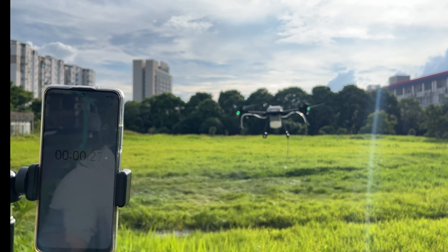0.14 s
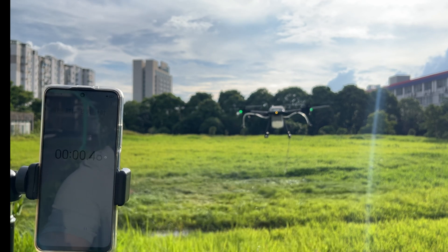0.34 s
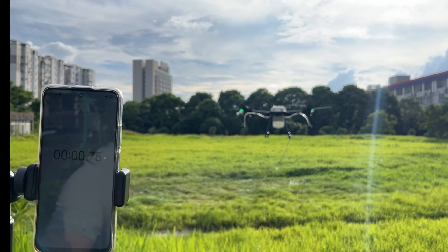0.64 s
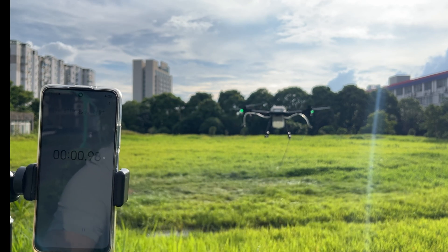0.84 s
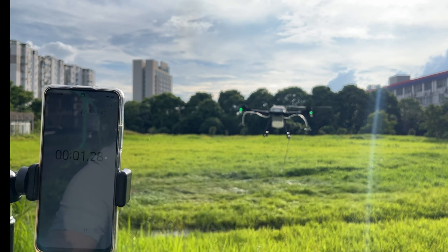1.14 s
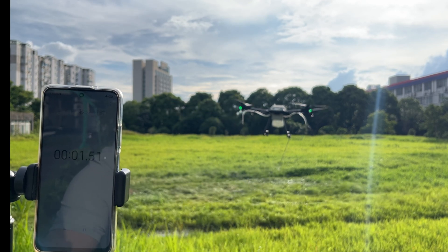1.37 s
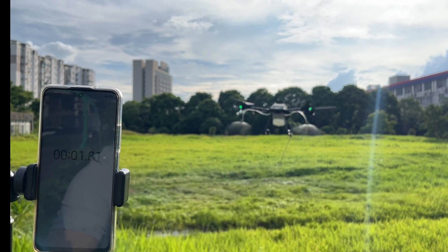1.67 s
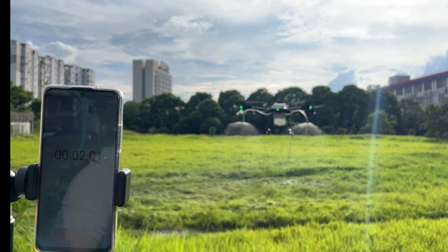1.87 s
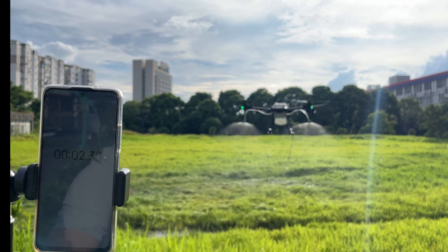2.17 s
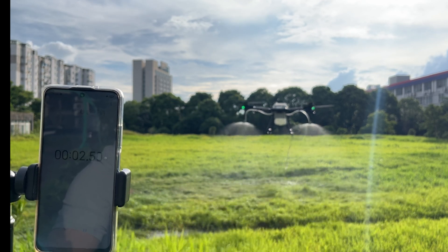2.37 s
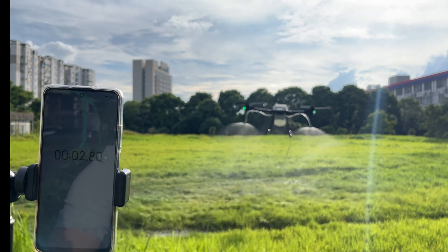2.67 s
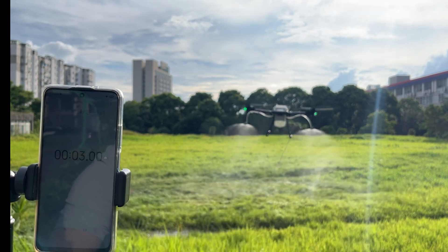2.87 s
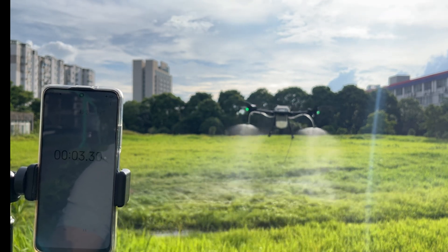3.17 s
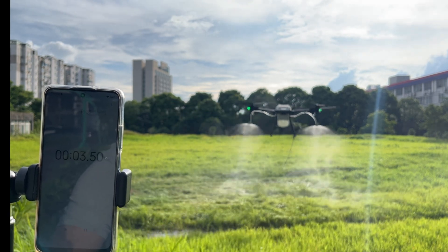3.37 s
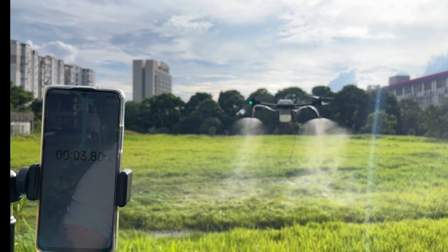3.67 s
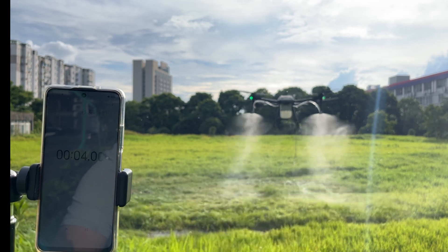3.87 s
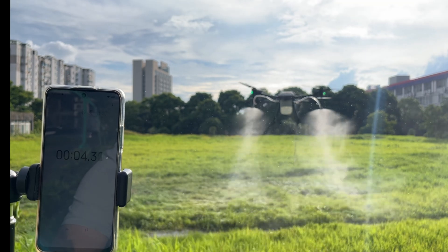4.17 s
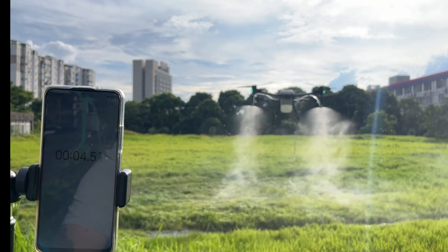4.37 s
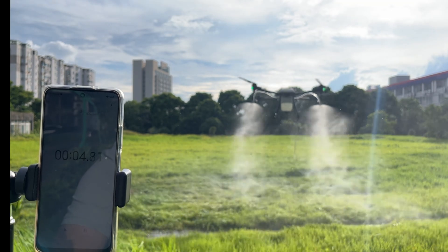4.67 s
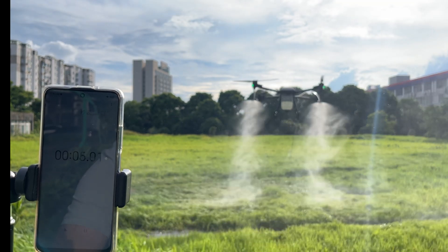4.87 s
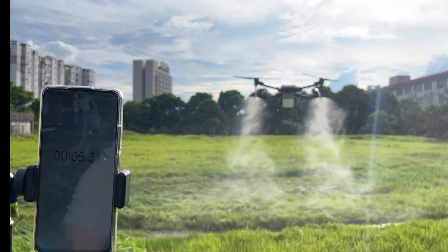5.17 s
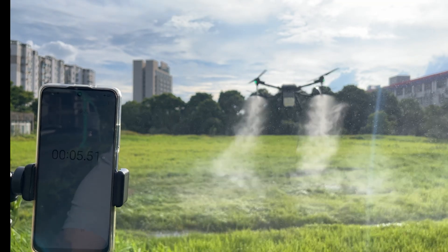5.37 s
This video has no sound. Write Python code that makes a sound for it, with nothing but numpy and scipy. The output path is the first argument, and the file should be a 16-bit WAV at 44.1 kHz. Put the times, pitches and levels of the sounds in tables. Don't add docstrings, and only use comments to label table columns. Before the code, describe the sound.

A steady loud rotor drone fills the whole stretch, low and throbbing as the four rotors drift in and out of step, with rushing noise pulsing on top. Faint insects whine very high. Spray nozzles briefly whistle, then hiss stronger and higher in the second half. Wind gusts thump a stereo phone microphone in an open field, hardest near 2.6, 4.1 and 5.5 seconds.

```python
import sys
import numpy as np
from scipy import signal
from scipy.fft import rfft, irfft
from scipy.io import wavfile
from scipy.ndimage import uniform_filter1d

SR = 44100
rng = np.random.default_rng(int(sys.argv[2]) if len(sys.argv) > 2 else 0)


def gain_from_db(level_db):
    decades = np.asarray(level_db, float) / 20
    return 10 ** decades


def wrap_up_sound(samples):
    columns = np.atleast_2d(samples).T
    tamed = np.clip(columns, -1, 1)
    steps = np.round(tamed * 32767).astype(np.int16)
    wavfile.write(sys.argv[1], SR, steps)


N = 243917
TIME = np.arange(N) / SR
HZ = np.arange(N // 2 + 1) * SR / N + 1e-3

# peak_s, level_db, length_s
GUSTS = [
    (.01, -29.5, 0.086),
    (.3, -38, 0.08),
    (.45, -28.5, 0.13),
    (2.584, -21, 0.045),
    (2.97, -30, 0.039),
    (3.236, -25, .1),
    (4.042, -15, 0.052),
    (4.202, -22, 0.054),
    (4.5, -28, 0.18),
    (5.51, -13, 0.047),
]
# frequency_hz, density_db
GUST_COLOUR = [(22, -45), (36, -17), (55, 3), (75, -6), (105, -3), (170, -16), (300, -15), (600, -60),
               (2000, -56)]
# start_s, level_db, start_hz, end_hz, length_s
POPS = [
    (0.444, -37, 160, 60, 0.031),
    (2.584, -15.5, 262.5, 116, 0.032),
    (4.029, -17, 223, 100, 0.015),
    (4.233, -10.5, 196.6, 98, 0.02),
    (5.476, -8, 441, 90, 0.031),
]
# start_s, length_s, start_hz, end_hz, level_db
NEAR_WHINES = [(1.28, .14, 10700, 10520, -52), (1.4, .16, 10530, 10430, -45),
               (1.83, .07, 10470, 10560, -48), (1.99, .14, 10600, 10480, -44),
               (2.13, .24, 10490, 10480, -50), (2.71, .15, 10430, 10550, -48),
               (2.85, .31, 10520, 10310, -46), (3.24, .06, 10400, 10450, -47),
               (3.46, .17, 10470, 10310, -46), (4.52, .19, 10520, 10480, -49), (4.7, .3, 10380, 10450, -47),
               (4.98, .3, 10450, 10300, -43), (2.62, .27, 10880, 10950, -54),
               (2.93, .19, 11020, 10960, -49), (3.48, .14, 11060, 10900, -48),
               (4.85, .3, 10950, 10950, -52)]
# start_s, length_s, start_hz, end_hz, level_db
FAR_WHINES = [
    (0, .5, 13800, 13500, -63),
    (1.15, 1.0, 13850, 13830, -61),
    (2.4, .9, 13830, 13800, -59),
    (3.55, .45, 13820, 13800, -61),
]
# time_s, centre_hz, level_db
SPRAY = [
    (0, 3700, -58),
    (1.5, 3750, -54),
    (3.1, 3500, -55),
    (3.45, 3500, -48),
    (4.0, 4050, -46),
    (4.25, 4500, -47),
    (4.5, 4820, -41),
    (4.72, 5050, -43),
    (4.9, 5300, -40),
    (5.53, 5360, -40.5),
]
# start_s, length_s, pitch_hz, level_db
SPURTS = [
    (1.77, 0.11, 3820, -41),
    (2.0, 0.17, 3880, -39),
]
# start_s, peak_db
CRACKS = [(0.543, -9), (0.625, -12), (0.6609, -8), (0.6729, -4), (0.6848, -7), (.963, -11), (1.4915, -9),
          (2.2248, -14), (2.8993, -10), (2.9582, -10), (3.3962, -12), (3.6267, -9), (3.7289, -11)]
# time_s, level_db, treble_tilt_db (at 6.4 kHz)
VORTEX = [(0, -28.5, 0.5), (.3, -29.5, 0.5), (.5, -25, -2), (.7, -26.5, 0), (.9, -26, -2.5),
          (1.3, -27.5, -0.8), (1.8, -26, -2.5), (2.25, -28, -0.5), (2.7, -29, -0.5), (3.0, -27.5, 0.5),
          (3.2, -29, 0.5), (3.4, -25.5, -0.1), (3.8, -27.5, -0.5), (4.2, -29, 1), (4.55, -27.5, 0.8),
          (4.85, -26, 1.5), (5.2, -27.5, 0.8), (5.53, -27, -1)]
# frequency_hz, density_db
VORTEX_COLOUR = [(60, 3.5), (190, -5), (500, 1.5), (600, -5.5), (1300, 0.5), (1680, -11), (1950, -5),
                 (2500, -6), (3600, -11), (5200, -20.5), (7500, -18), (10500, -23), (14000, -25.5),
                 (16000, -24)]
# time_s, rotor1_hz, rotor2_hz, rotor3_hz, rotor4_hz
BLADE_PASS = [(0.0, 82.64, 76.19, 71.28, 64.81), (0.325, 80.56, 76.12, 67.93, 70.48),
              (0.65, 82.1, 76.38, 68.98, 67.49), (0.975, 80.57, 74.79, 70.43, 68.72),
              (1.3, 73.93, 77.4, 72.53, 69.76), (1.625, 74.27, 72.74, 72.13, 69.98),
              (1.95, 75.28, 72.52, 72.74, 72.6), (2.275, 74.56, 72.25, 71.03, 72.36),
              (2.6, 73.66, 72.83, 69.99, 69.58), (2.925, 77.26, 71.91, 71.45, 76.84),
              (3.25, 84.25, 82.09, 72.81, 67.51), (3.575, 82.99, 77.61, 72.99, 73.75),
              (3.9, 77.2, 75.05, 67.08, 74.55), (4.225, 77.63, 77.98, 68.17, 74.59),
              (4.55, 77.64, 77.38, 72.99, 68.34), (4.875, 78.19, 74.6, 73.94, 69.62),
              (5.2, 76.18, 79.15, 75.24, 71.08), (5.525, 79.96, 76.74, 70.04, 70.55)]
# multiple, level_db
OVERTONES = [(2, -35), (3, -39.5), (4, -38), (5, -39.5), (6, -40.5), (7, -48.5), (8, -49), (9, -52),
             (10, -51.5)]
THUMP_DB = [-28.6, -27.4, -24.1, -28.5]
SLAP_DB = [-0.7, -1.46, 0, -4]
# time_s, load_db
LOAD = [(0, 1.3), (.5, 2.5), (1.1, 1.2), (1.6, -1.5), (2.1, -0.5), (2.6, 1.5), (3.0, -4), (3.5, 0.3),
        (4.1, 1), (4.6, -0.7), (5.1, -0.2), (5.53, -2)]
# peak_s, load_db, length_s
SURGES = [
    (4.212, 7, .04),
    (4.6, 2.8, .22),
]
# frequency_hz, left_lead_rad
CHANNEL_PHASE = [(200, -.1), (520, -.7), (850, .45), (1300, -.1), (1600, -1.2), (1850, -.1), (3200, .6),
                 (4500, 0), (5500, -1.8), (6600, -1.4), (8350, -3.14), (11100, -6.05), (12900, -6.5),
                 (15100, -9.42)]
# frequency_hz, left_minus_right_db
PORT_BALANCE = [(400, -.5), (520, -1.7), (720, -7), (930, -1.8), (1200, -2.2), (1700, 1), (2000, -1.5),
                (2400, 0), (2900, -1.4), (3600, 1.8), (7000, 0)]
# frequency_hz, level_db
SCATTER = [(100, -21), (400, -14.5), (750, 0), (1100, -13), (1600, 2), (2200, -17.5), (3500, -6.5),
           (5100, 1), (7000, -17), (8400, -13.5), (10000, -7), (12000, -6), (13500, 2), (15200, -13)]

HOVER_HZ = 74


def curves(table):
    time_s, *columns = np.transpose(table)
    return np.array([np.interp(TIME, time_s, column) for column in columns])


def over_hz(table):
    hz, value = np.transpose(table)
    return np.interp(np.log(HZ), np.log(hz + 1), value)


def unit(x):
    return x / np.sqrt(np.mean(x ** 2))


def colour(x, gain):
    return irfft(rfft(x) * gain, N)


def walk(rate_hz):
    hold = int(SR / rate_hz)
    held = np.repeat(rng.standard_normal(N // hold + 3), hold)
    slewed = uniform_filter1d(uniform_filter1d(held, hold), hold)
    return 1.3 * slewed[hold:hold + N]


def swell(peak_s, length_s):
    return np.exp(-((TIME - peak_s) / length_s) ** 2)


def phase(hz):
    return 2 * np.pi * np.cumsum(hz, axis=-1) / SR


def air_pops():
    pops = np.zeros(N)
    for start_s, level_db, start_hz, end_hz, length_s in POPS:
        part = np.clip((TIME - start_s) / length_s, 0, 1)
        hz = start_hz * (end_hz / start_hz) ** np.sqrt(part)
        envelope = np.sin(np.pi * part ** 0.74).clip(0) ** .8
        pops += gain_from_db(level_db) * envelope * np.sin(phase(hz))
    return pops


def wind():
    breeze_db = -33.5
    gusts = gain_from_db(breeze_db) + sum(gain_from_db(db) * swell(peak_s, length_s) for peak_s, db, length_s in GUSTS)
    lumps = gusts * gain_from_db(2 * walk(29.77))
    gain = gain_from_db(over_hz(GUST_COLOUR))
    shared, left, right = [unit(colour(rng.standard_normal(N), gain)) for _ in range(3)]
    buffet = .88 * shared + .47 * np.array([left, right])
    return lumps * buffet + air_pops() * np.array([[1.15], [.85]])


def whine(start_s, length_s, start_hz, end_hz, level_db, throb_db):
    fade_s, waver_hz = 0.041, 22
    inside_s = np.minimum(TIME - start_s, start_s + length_s - TIME)
    edge = np.clip(inside_s / fade_s, 0, 1)
    hz = np.interp(TIME, [start_s, start_s + length_s], [start_hz, end_hz])
    angle = phase(hz + waver_hz * walk(60))
    return np.sqrt(2) * edge * gain_from_db(level_db + throb_db * walk(18)) * np.sin(angle)


def insects():
    near = sum(whine(*row, throb_db=0.93) for row in NEAR_WHINES)
    far = sum(whine(*row, throb_db=3) for row in FAR_WHINES)
    return near + far


def hiss(hz, width_hz):
    lowpass = 1 / (1 + (HZ / width_hz) ** 2)
    slow = [unit(colour(rng.standard_normal(N), lowpass)) for _ in range(2)]
    angle = phase(hz)
    return slow[0] * np.cos(angle) + slow[1] * np.sin(angle)


def spurts():
    out = np.zeros(N)
    for start_s, length_s, pitch_hz, level_db in SPURTS:
        envelope = swell(start_s + length_s / 2, length_s / 2)
        out += gain_from_db(level_db) * envelope * hiss(np.full(N, pitch_hz), width_hz=45)
    return out


def spray():
    hz, level_db = curves(SPRAY)
    climb = (hz - hz.min()) / np.ptp(hz)
    apart = .035 * climb ** 1.4
    strands = np.zeros(N)
    for side in (-1, 1):
        strand_hz = hz * (1 + side * apart + .01 * walk(8))
        strands += hiss(strand_hz, width_hz=125) * gain_from_db(2 * walk(20))
    octave = gain_from_db(-6.5) * hiss(1.95 * hz, width_hz=550)
    haze = gain_from_db(2.5) * hiss(hz, width_hz=1300)
    return gain_from_db(level_db + 1.8) * (strands + octave + haze) + spurts()


def cracks():
    ring_s = np.arange(SR // 100) / SR
    kicks = np.zeros(N)
    for start_s, peak_db in CRACKS:
        at = int(start_s * SR)
        snap = rng.standard_normal(len(ring_s)) * np.exp(-ring_s / .002)
        kicks[at:at + len(ring_s)] += gain_from_db(peak_db) * snap / np.max(np.abs(snap))
    highpass = (HZ / 600) ** 2 / (1 + (HZ / 600) ** 2)
    lowpass = 1 / (1 + (HZ / 3400) ** 4)
    return 2 * colour(kicks, highpass * lowpass)


def vortices(turn, slaps_db):
    level_db, tilt_db = curves(VORTEX)
    gates = gain_from_db(slaps_db) * np.exp(4 * (np.cos(turn + 1.2) - 1))
    gain = gain_from_db(over_hz(VORTEX_COLOUR))
    noise = rng.standard_normal(N)
    out = np.zeros(N)
    for hz in 50 * 2. ** np.arange(9):
        passes = sum(gain_from_db(2 * walk(40)) * gate for gate in gates)
        passes = passes / np.sqrt(uniform_filter1d(passes ** 2, size=SR // 16))
        depth = .44 * np.exp(-(np.log2(hz / 2000) / 2.3) ** 2)
        gated = noise * (1 - depth + depth * passes)
        band = np.cos(np.pi / 2 * np.clip(np.log2(HZ / hz), -1, 1)) ** 2
        lean_db = tilt_db * np.clip(np.log2(hz / 1600) * .5, 0, 1.5)
        out += gain_from_db(lean_db + 0.55 * walk(4.165)) * colour(gated, band * gain)
    return unit(out) * gain_from_db(level_db + 2.0)


def blade_tones(turn, hz, slaps_db):
    thump_db_per_hz, nearing_db_per_s = .65, .4
    thump_db = np.c_[THUMP_DB] + thump_db_per_hz * (hz - HOVER_HZ) + nearing_db_per_s * TIME
    thump_db = thump_db + sum(db * swell(peak_s, length_s) for peak_s, db, length_s in SURGES)
    out = np.sqrt(2) * np.sum(gain_from_db(thump_db) * np.cos(turn), axis=0)
    for angle, slap_db in zip(turn, slaps_db):
        for multiple, level_db in OVERTONES:
            shaken = multiple * angle + .2 * multiple * walk(10) + 2 * np.pi * rng.random()
            out += np.sqrt(2) * gain_from_db(level_db + slap_db + 4.2 * walk(8)) * np.cos(shaken)
    return out


def blade_slaps(hz):
    slap_db_per_hz, wander_db = .5, 1.5
    wander = np.array([walk(2.61) for _ in hz])
    return np.c_[SLAP_DB] + slap_db_per_hz * (hz - HOVER_HZ) + wander_db * wander + curves(LOAD)


def ports(x):
    half = gain_from_db(over_hz(PORT_BALANCE) / 2) * np.exp(.5j * over_hz(CHANNEL_PHASE))
    return np.array([colour(x, half), colour(x, 1 / half)])


def scene():
    hz = curves(BLADE_PASS)
    turn = phase(hz)
    slaps_db = blade_slaps(hz)
    drone = blade_tones(turn, hz, slaps_db) + vortices(turn, slaps_db) + cracks()
    direct = drone + spray() + insects()
    gain = gain_from_db(over_hz(SCATTER))
    scattered = np.array([colour(vortices(turn, slaps_db), gain) for _ in range(2)])
    return ports(direct) + scattered + wind()


def top_cut(x):
    return signal.sosfilt(signal.butter(12, 15810, fs=SR, output="sos"), x)


def record(dry):
    mix = np.tanh(0.59 * dry) / 0.57
    return top_cut(mix)


dry = scene()
out = record(dry)
wrap_up_sound(out)
```